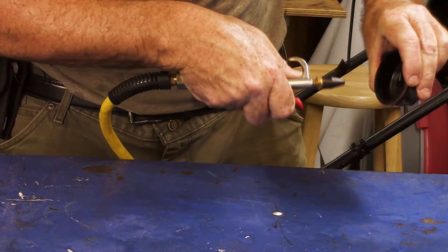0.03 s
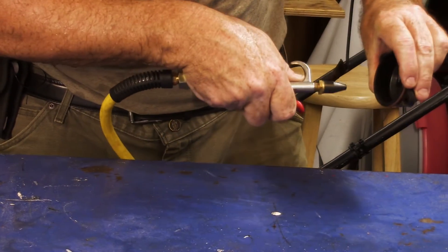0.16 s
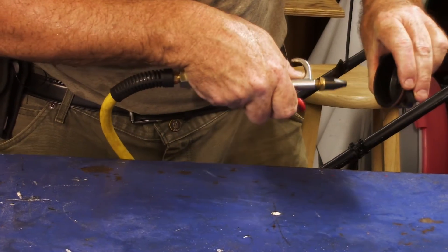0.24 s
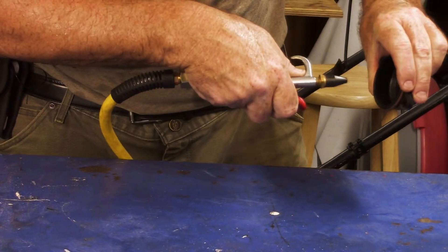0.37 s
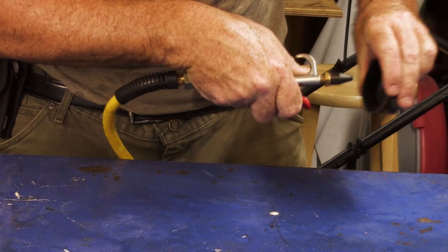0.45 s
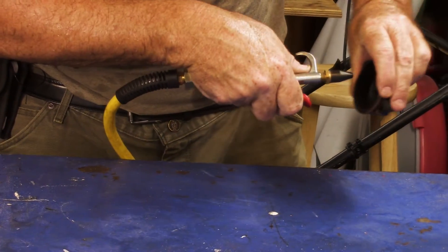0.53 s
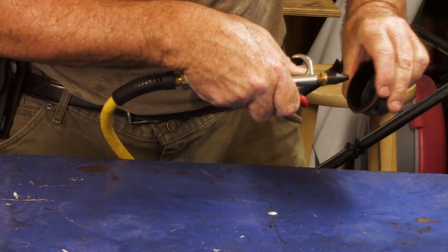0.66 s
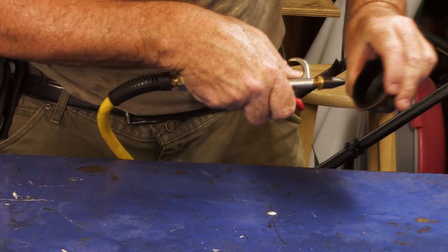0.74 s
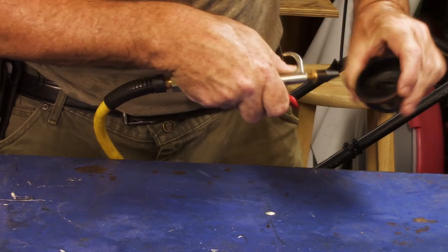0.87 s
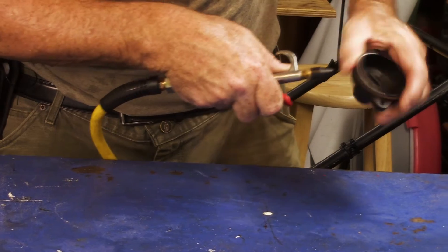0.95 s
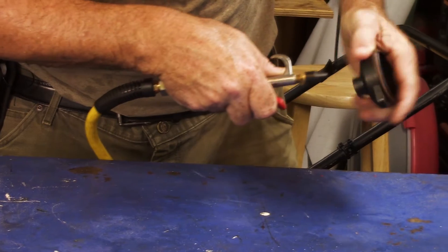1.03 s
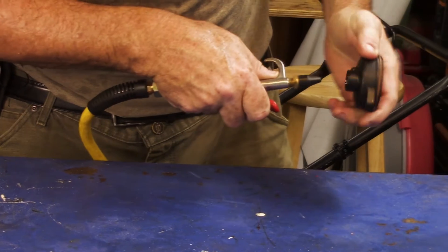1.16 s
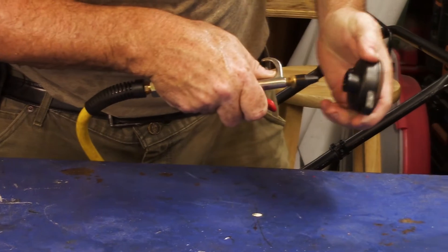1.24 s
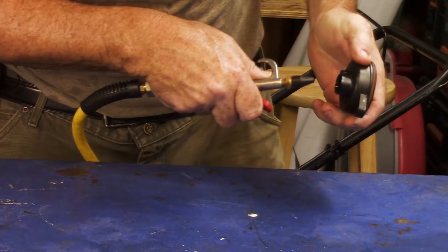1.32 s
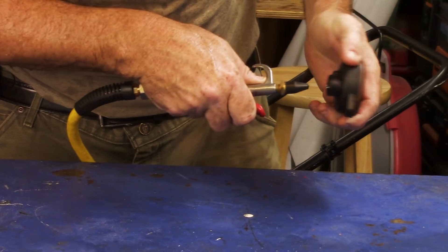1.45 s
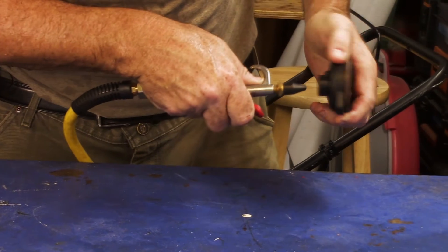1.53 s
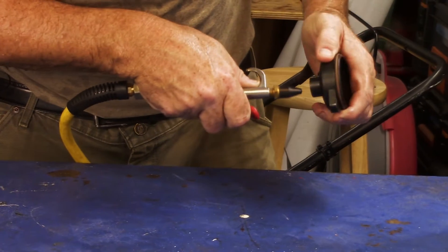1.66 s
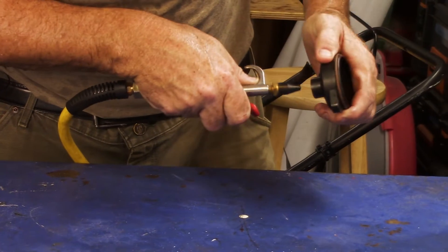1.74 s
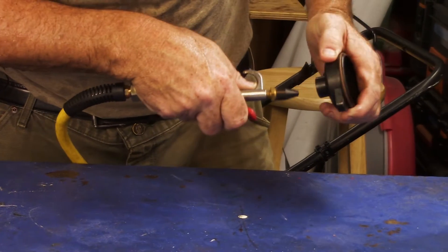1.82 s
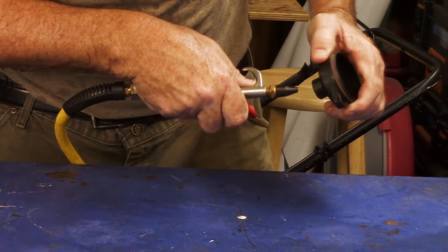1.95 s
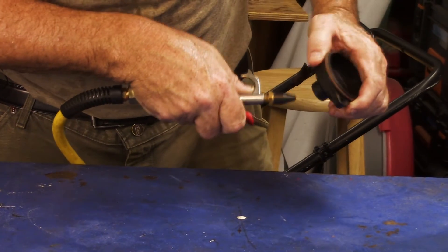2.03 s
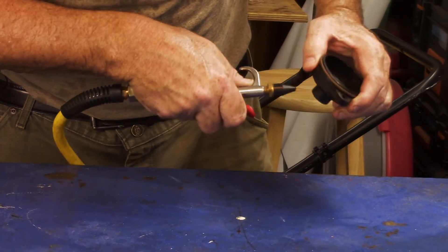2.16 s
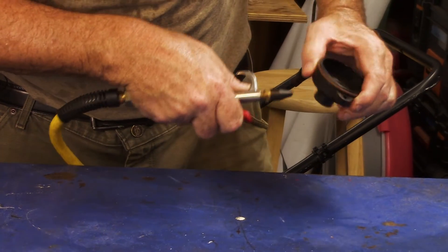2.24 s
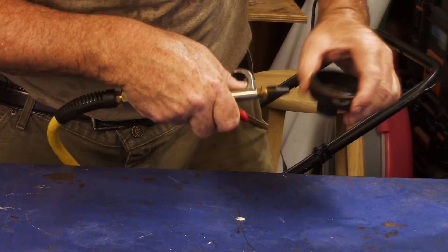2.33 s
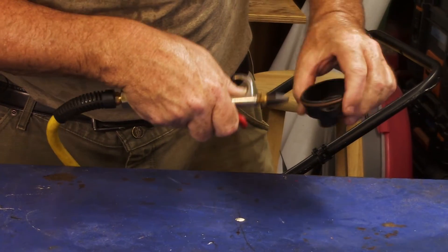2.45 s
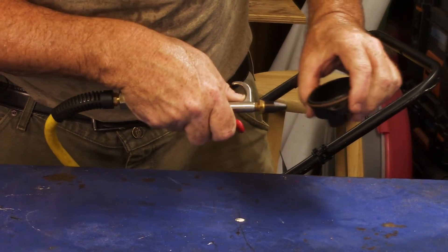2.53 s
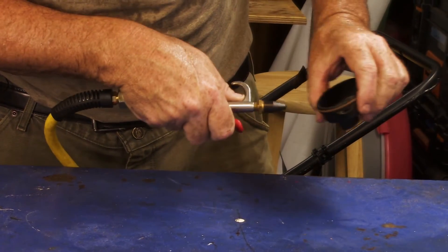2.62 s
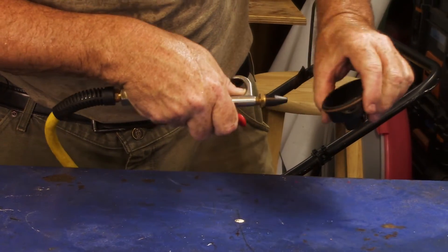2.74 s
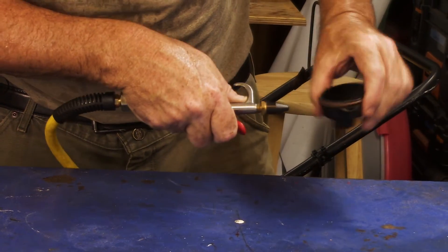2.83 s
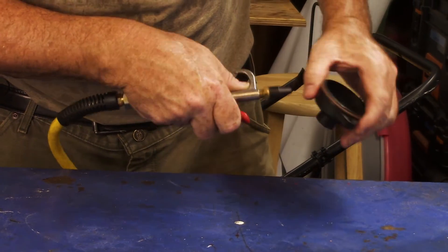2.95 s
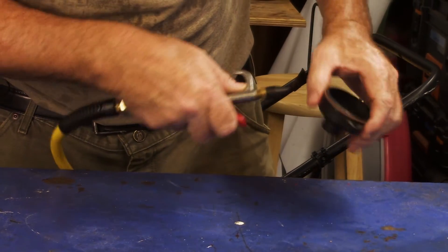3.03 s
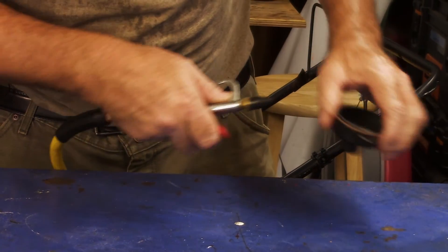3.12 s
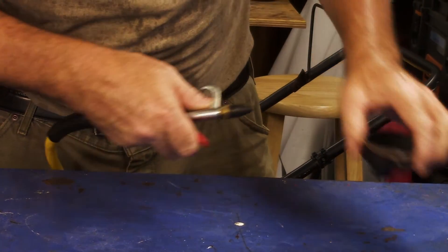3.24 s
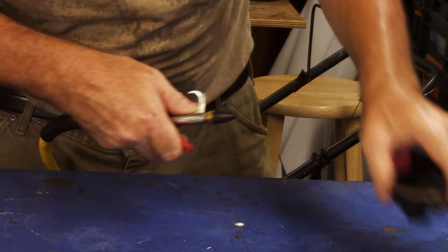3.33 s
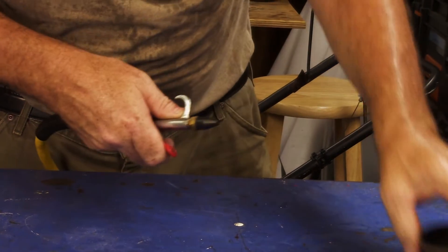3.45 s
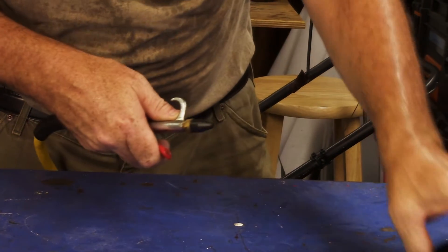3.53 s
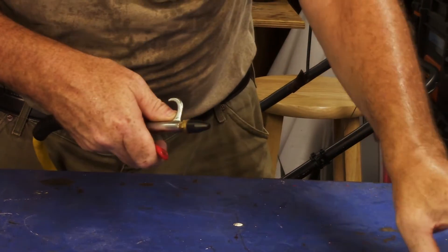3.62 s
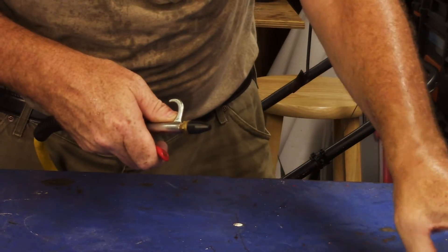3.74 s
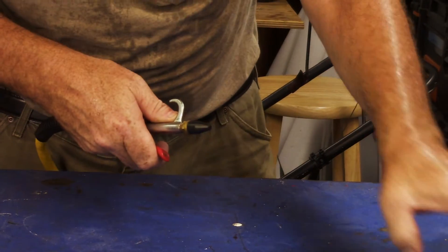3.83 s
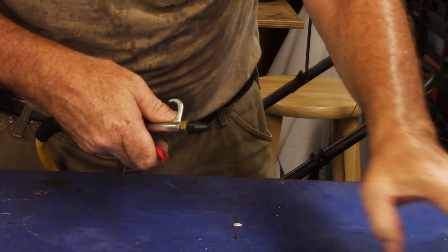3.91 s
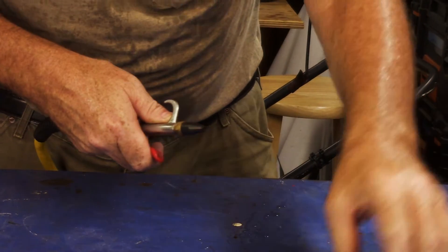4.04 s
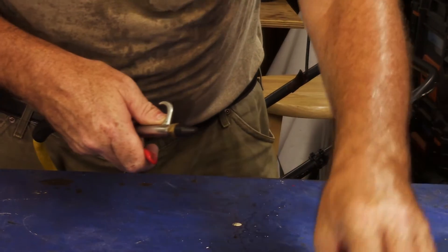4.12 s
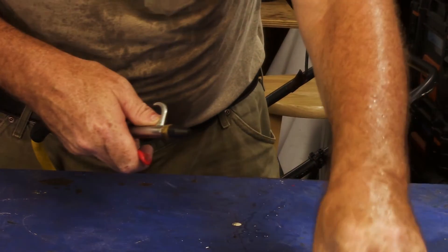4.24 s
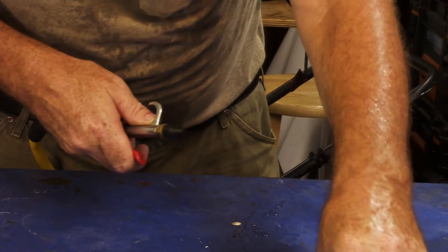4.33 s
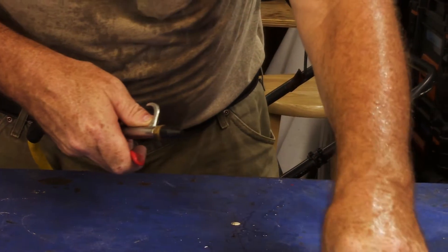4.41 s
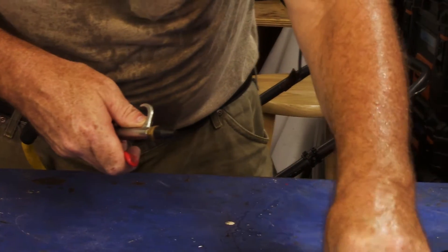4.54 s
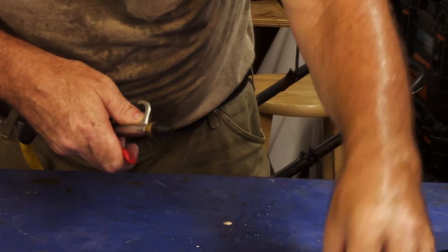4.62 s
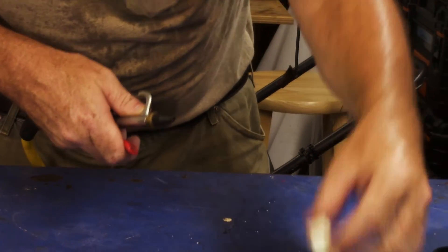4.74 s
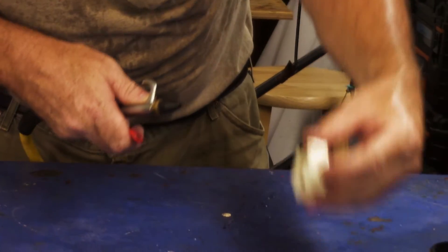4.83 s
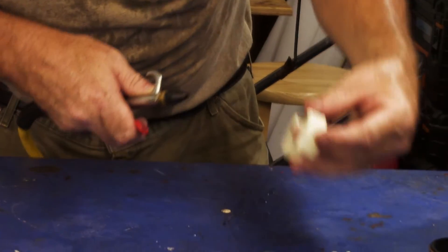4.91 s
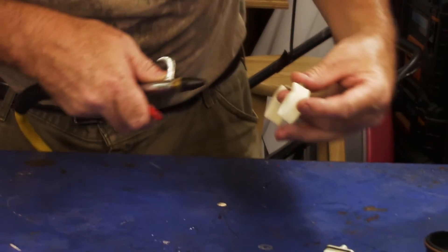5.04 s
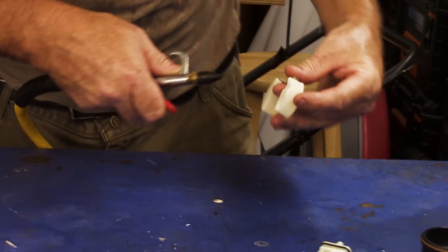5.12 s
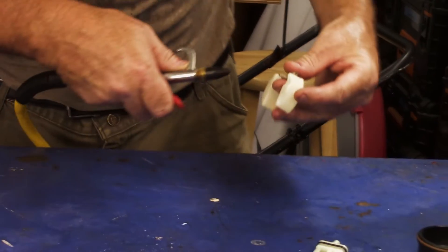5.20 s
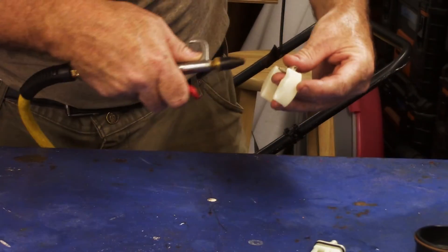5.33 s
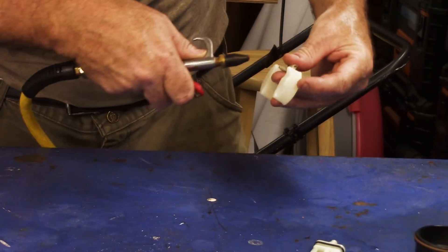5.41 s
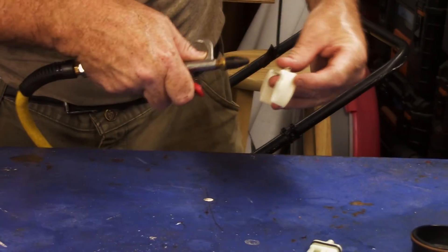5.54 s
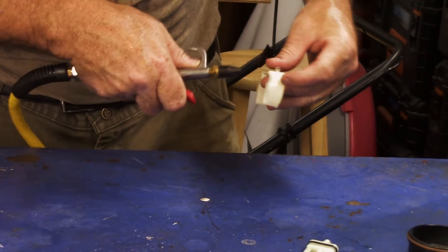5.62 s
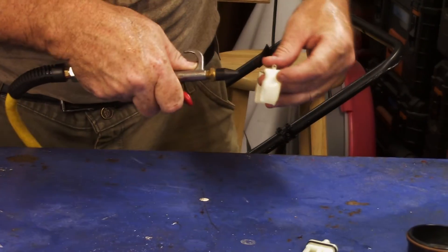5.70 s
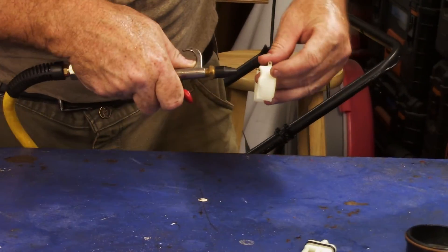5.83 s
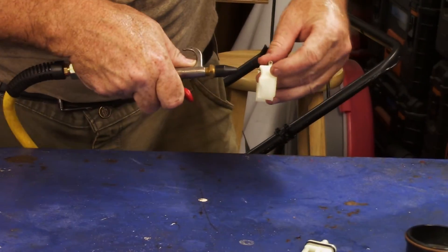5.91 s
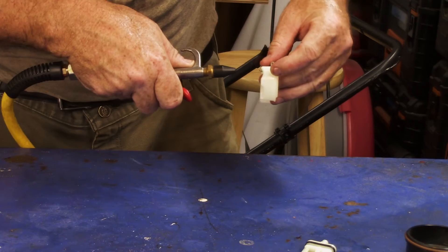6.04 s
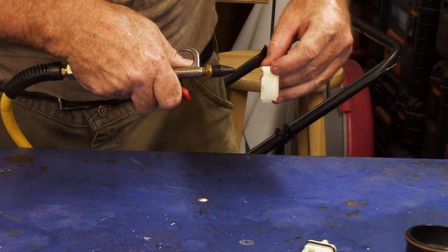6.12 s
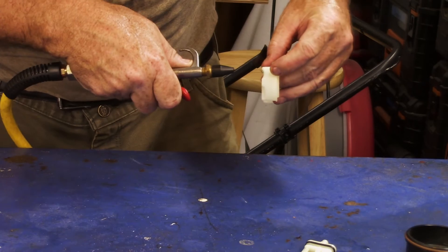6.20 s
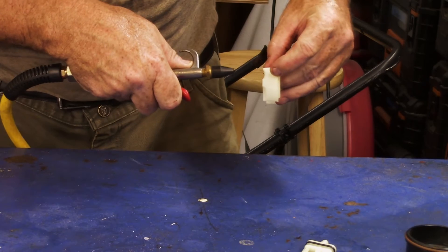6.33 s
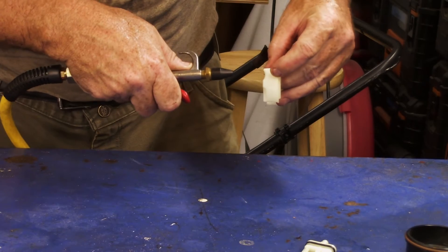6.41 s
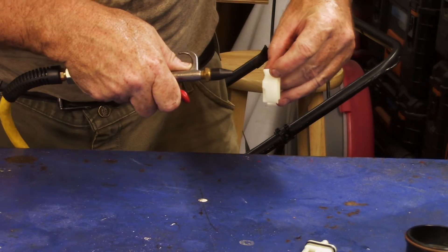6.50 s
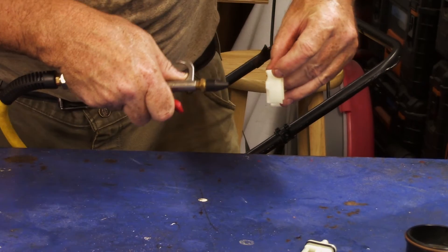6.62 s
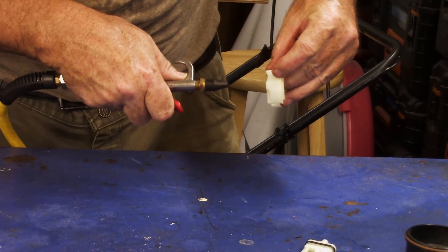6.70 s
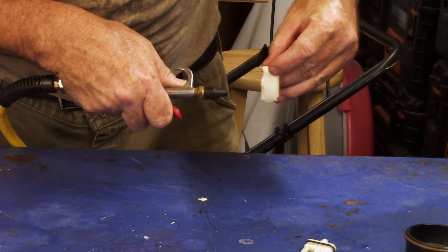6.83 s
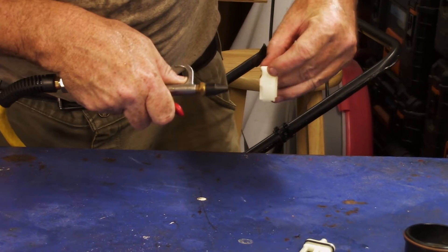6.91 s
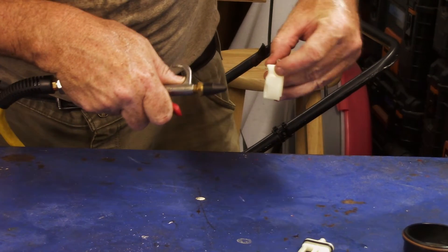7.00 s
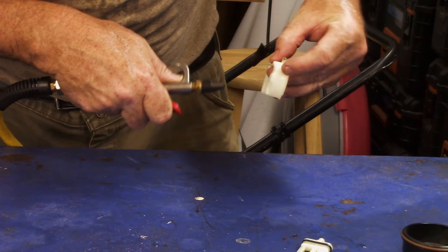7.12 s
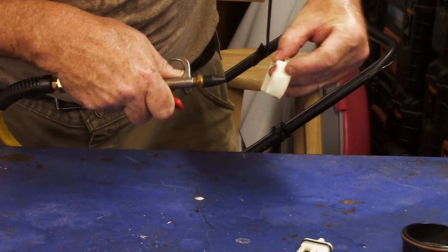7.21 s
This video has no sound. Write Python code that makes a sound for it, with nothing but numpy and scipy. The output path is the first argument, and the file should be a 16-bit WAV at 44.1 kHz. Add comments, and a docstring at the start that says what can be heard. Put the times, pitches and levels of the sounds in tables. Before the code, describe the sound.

In a cluttered home workshop, an air gun already blowing cuts off, ticks, then fires a short burst and a long roaring one with shifting hollow resonances and brief dips. After about three seconds only motor drone and fine leaking hiss remain, rising slowly. A light plastic cap knocks on the bench, then a softer, whistling blast lasts to the end. Close, compressed, dry pickup.

```python
"""Air blow gun at a workbench

Blasts of air clean a plastic cap, then a small plastic part; a motor runs and air leaks throughout.
The jet is shaped noise: it hisses, roars where it strikes a piece, rings its hollows and hoots over openings.
The lever ticks are noise bursts; the cap, set down between the blasts, is decaying modes plus a noise thud.
One close microphone: its limiter holds the blasts down, and the shop noise swells back slowly after them."""
import sys
import numpy as np
from scipy import signal
from scipy.fft import rfft, irfft
from scipy.io import wavfile
from scipy.ndimage import uniform_filter1d, map_coordinates

SR = 44100
rng = np.random.default_rng(int(sys.argv[2]) if len(sys.argv) > 2 else 0)


def generate_wav(signal):
    """Clip the signal to [-1, 1] and save it as 16-bit WAV at the path in sys.argv[1]."""
    frames = np.transpose(np.atleast_2d(signal))
    scaled = np.clip(frames, -1, 1) * 32767
    pcm = np.round(scaled).astype(np.int16)
    wavfile.write(sys.argv[1], SR, pcm)


N = 320166


def undb(db):
    """Decibels to gain."""
    return 10 ** (np.asarray(db) / 20)


def colour(points, hz):
    """Spectrum in dB at the given frequencies, scaled to unit mean power over them."""
    point_hz, point_db = np.transpose(points)
    db = np.interp(np.log(hz + 1), np.log(point_hz), point_db)
    return db - 10 * np.log10(np.mean(undb(db) ** 2))


def peak(hz, centre_hz, width_hz):
    """Bell shape of one resonance: 1 at its centre, 0.5 half a width away."""
    return np.exp2(-(2 * (hz - centre_hz) / width_hz) ** 2)


def gate(s, start_s, end_s, fade_s=0.027):
    """1 between start and end, with linear edges centred on them."""
    rise = np.clip((s - start_s) / fade_s + .5, 0, 1)
    fall = np.clip((end_s - s) / fade_s + .5, 0, 1)
    return rise * fall


def walk(s, rate_hz):
    """Smooth random wander with a spread near 1, through rate_hz random points per second."""
    steps = rng.standard_normal(2048)
    return map_coordinates(steps, [np.abs(s) * rate_hz], order=3, mode="wrap")


def noise(shape):
    """Turbulence: white noise given the level shape(Hz, s) in dB, frame by frame."""
    frame, overlap = 512, 384  # samples
    hz, s, spectrum = signal.stft(rng.standard_normal(N), SR, nperseg=frame, noverlap=overlap)
    gain = undb(shape(hz[:, None], s))
    return signal.istft(spectrum * gain, SR, nperseg=frame, noverlap=overlap)[1][:N]


def filtered(x, shape):
    """Steady filter whose gain in dB is shape(Hz)."""
    hz = np.fft.rfftfreq(len(x), 1 / SR)
    return irfft(rfft(x) * undb(shape(hz)), len(x))


def fading(t60_s):
    """Half a second of exponential decay, 60 dB per t60."""
    return np.exp(-np.log(1000) * np.arange(SR // 2) / SR / t60_s)


def blows(table, ring):
    """Each row (s, dB) sets off the ring."""
    hits = np.zeros(N)
    for s, db in table:
        hits[int(s * SR)] += undb(db)
    return signal.fftconvolve(hits, ring)[:N]


def shop(x, wet_db, t60_s, low_hz=700):
    """Direct sound plus dense reflections from the clutter, which scatters little bass."""
    tail = rng.standard_normal(SR // 2) * fading(t60_s)
    tail[:SR // 500] = 0  # no reflection in the first 2 ms
    tail = signal.sosfilt(signal.butter(2, low_hz, "high", fs=SR, output="sos"), tail)
    tail *= undb(wet_db) / np.linalg.norm(tail)
    tail[0] = 1
    return signal.fftconvolve(x, tail / np.linalg.norm(tail))[:N]


def ripples(hz, s, rate_hz, echo_s=.0016, count=6):
    """Comb pattern of short echoes off hands and bench whose paths slowly change; spread near 1."""
    comb = 0
    for delay_s in echo_s * rng.uniform(.3, 1.7, count):
        comb = comb + np.cos(2 * np.pi * hz * (delay_s + 4e-5 * walk(s, rate_hz)))
    # only short waves are thrown back by things so small
    return comb * np.sqrt(2 / count) * np.minimum(hz / 4000, 1)


def wavering(hz, s, centre_hz, width_hz, waver=.0092):
    """A resonance in the air near the hand, which is never still."""
    return peak(hz, centre_hz * (1 + waver * walk(s, 13)), width_hz)


def flow(s):
    """Level, low rush, sizzle and dulling in dB, from whichever press of the lever passes most air."""
    # Presses of the lever. Each row: pressed in s, time to open in s, let go in s, level in dB,
    # swell while held in dB/s, closing in dB/s, low rush in dB, sizzle in dB.
    blasts = [(-.2, .1, 0.29, 3, -14, 247, 9, 8.5), (.49, 0.17, 0.71, -.5, -4.5, 273, 10.5, 7.5),
              (1.09, 0.25, 2.214, 4.5, -8, 309, 4, 5), (2.1, .1, 2.32, -17.5, -11, 146, 4.5, -4),
              (2.315, 0.16, 2.7985, -2, 27, 274, 9, 5.5), (6.02, .41, 8.2, -7, -7.5, 300, -0.5, -3)]
    flow_db_per_decade = 68.5  # flow is a power of the lever's travel
    dull_db_per_s, dull_max_db = 79, 8.5  # on release the treble dies first
    columns = np.transpose(blasts)[:, :, None]
    pressed, opening, let_go, level_db, swell, close, rush_db, sizzle_db = columns
    travel = np.clip((s - pressed) / opening, 1e-4, 1)
    held_s = np.maximum(np.minimum(s, let_go) - pressed - opening, 0)
    closing_s = np.maximum(s - let_go, 0)
    db = level_db + flow_db_per_decade * np.log10(travel) + swell * held_s - close * closing_s
    press = np.argmax(db, axis=0)
    dull_db = np.clip(dull_db_per_s * (s - let_go[press, 0]), 0, dull_max_db)
    return db.max(axis=0), rush_db[press, 0], sizzle_db[press, 0], dull_db


def catches(hz, s, fade_s=.04, graze_roar_db=-4, part_in_hand_s=4.75):
    """Gain, roar and ringing in dB while the jet is in a hollow; turning the piece retunes its modes."""
    # The jet catches in the piece. Each row: start in s, end in s, gain in dB, roar in dB added to
    # that of a grazing jet, ring share, turn of the piece (0 facing, 1 away) at start and at end.
    catch_rows = [(-.1, 0.101, 5.5, 16, 0.45, 0.5, .6), (0.103, 0.206, 8.5, 18, 0.44, .6, 0.46),
                  (0.208, 0.436, 7, 12, 0.63, 0.5, 0.52), (0.529, 1.052, 6, 9.5, 0.61, 0.43, 0.41),
                  (1.308, 1.895, 9, 8.5, 1.1, 0.31, .85), (1.884, 2.084, 6.5, 4.5, 0.56, 0.3, .95),
                  (2.2, 2.242, 4.5, -6, 0.4, .95, 1), (2.374, 2.427, 13.5, 7.5, .1, .4, .45),
                  (2.572, 2.755, 7.5, 7, 0.74, 0.23, .1), (2.885, 2.945, 4.5, 2, .3, .3, .3),
                  (6.37, 6.571, 2.5, -1.5, 0.53, .05, .25), (6.551, 6.758, 1.5, 3, 1.56, 0.15, .55),
                  (6.751, 7.03, 4, -3, 1.26, 0.3, .9)]
    # Air in the hollows. Each row: Hz facing the jet, Hz turned away, width in Hz, dB at ring share 1.
    cap_hollow = [(1750, 1600, 400, 3), (4850, 3700, 530, 5.5), (6520, 7500, 1050, 8),
                  (12900, 11400, 1000, 6)]
    part_hollow = [(3700, 3900, 1030, 4.2), (8750, 11300, 3400, 3.3)]
    gain_db, roar_db, ring_db = 0, graze_roar_db, 0
    for start, end, gain, roar, ring, first_turn, last_turn in catch_rows:
        caught = gate(s, start, end, fade_s)
        turn = np.interp(s, [start, end], [first_turn, last_turn])
        gain_db = gain_db + caught * gain
        roar_db = roar_db + caught * roar
        hollow = cap_hollow if start < part_in_hand_s else part_hollow
        for facing_hz, away_hz, width_hz, db in hollow:
            mode_hz = facing_hz + turn * (away_hz - facing_hz)
            ring_db = ring_db + caught * ring * db * wavering(hz, s, mode_hz, width_hz)
    return gain_db, roar_db, ring_db


def blow_gun(roar_flutter_db=1.62, ripple_db=1.47, bass_cut_hz=100, tail_roar=0.93, throttle_fade_s=0.046,
             flutter_db=0.82, hoot_fade_s=.045):
    """Jet noise, coloured by the valve and by whatever the jet strikes."""
    # Jet spectrum. Each row: Hz, relative dB per Hz.
    jet_colour = [(50.0, -37.5), (110.0, -27.5), (220.0, -20), (420.0, -9.5), (650.0, -7), (1000.0, 0.5),
                  (2000.0, 1), (4000.0, 2), (6000.0, 0.84), (8500.0, 2.5), (11000.0, -1.5), (12400.0, -7.5),
                  (13400.0, -12.5), (15700.0, -12.5)]
    # Resonances of the barely open valve. Each row: Hz, width in Hz, dB.
    valve = [(3800, 1000, 9), (8040, 1300.0, 13.5), (13100, 530, 12)]
    # Lever only just pressed. Each row: start in s, end in s, level in dB.
    throttled_rows = [(0.403, 0.574, -31.5), (1.08, 1.204, -31.5), (6.12, 6.24, -61)]
    # Standing waves between bench, body and microphone. Each row: Hz, width in Hz, dB.
    bench = [(494, 98, 3), (1007, 21, -4.5), (1278, 53, 1.5), (1540, 23, 4), (1590, 60, 1), (1756, 40, -2),
             (2294, 31, 8.5), (2500, 65, 4), (2656, 60, 2)]
    # Jet across an opening: hoot or whistle. Each row: start in s, end in s, Hz, width in Hz, dB.
    hoots = [(-.1, .42, 4620, 400, 7), (0.633, 0.807, 465, 150, 9.5), (1.3, 1.72, 1720, 650, 4),
             (2.382, 2.435, 1132, 1000, 10), (2.833, 2.94, 1800, 700, 6), (6.203, 6.51, 2460, 603, 7),
             (6.377, 6.717, 497, 150, 10), (6.31, 6.542, 9900, 450, 5.5), (6.53, 7.036, 5440, 1550, 7.5),
             (7.04, 7.3, 3820, 1520, 4.5)]
    rush_loss, sizzle_loss = 0.62, 0.46  # dB lost per dB gained by a catch

    def shape(hz, s):
        flow_db, rush_db, sizzle_db, dull_db = flow(s)
        catch_db, roar_db, ring_db = catches(hz, s)
        # big eddies on the piece roar and rush; small ones at its edges sizzle
        pitch = np.log(hz + 1)
        roar = np.interp(pitch, np.log([60, 400, 1200, 2500, 7000]), [0.87, 0.7, 1, 0.79, 0.058])
        rush = np.interp(pitch, np.log([400, 1200]), [1, 0])
        sizzle = np.interp(pitch, np.log([5000, 15000]), [0, 1])
        db = colour(jet_colour, hz)
        db = db + roar * (roar_db + tail_roar * dull_db + roar_flutter_db * walk(s, 25))
        db = db + rush * (rush_db - rush_loss * catch_db)
        db = db + sizzle * (sizzle_db - sizzle_loss * catch_db - dull_db)
        db = db + ring_db + ripple_db * ripples(hz, s, rate_hz=3.0)
        for start, end, centre_hz, width_hz, gain_db in hoots:
            blown = gate(s, start, end, hoot_fade_s)
            db = db + gain_db * blown * wavering(hz, s, centre_hz, width_hz)
        size = undb(flow_db + catch_db)
        valve_db = sum(gain_db * peak(hz, centre_hz, width_hz) for centre_hz, width_hz, gain_db in valve)
        for start, end, seep_db in throttled_rows:
            throttled = gate(s, start, end, throttle_fade_s)
            db = db + throttled * valve_db
            size = np.hypot(size, throttled * undb(seep_db))
        # colour only shares the power out among the bands; flow and catch set how much there is
        db = db - 10 * np.log10(np.mean(undb(db) ** 2, axis=0))
        return db + 20 * np.log10(size + 1e-9) + flutter_db * walk(s, 30)

    def bench_db(hz):
        return sum(db * peak(hz, centre_hz, width_hz) for centre_hz, width_hz, db in bench)

    jet = filtered(noise(shape), bench_db)
    # so small a nozzle radiates little bass
    jet = signal.sosfilt(signal.butter(1, bass_cut_hz, "high", fs=SR, output="sos"), jet)
    return shop(jet, wet_db=-7.5, t60_s=0.07)


def motor(turn_hz=58.87, fan_db=-41.5, waver_db=2.8, throb=0.085):
    """Shaft harmonics that waver slightly, over a fan rush that throbs once a turn."""
    # Shaft harmonics. Each row: multiple of the turning rate, mean level in dB rms.
    harmonics = [(4, -61), (7, -55), (12, -64.5), (14, -55.5), (15, -59.5), (16, -49.5), (17, -57),
                 (18, -56), (19, -64.5)]
    # Air moved by the motor. Each row: Hz, relative dB per Hz.
    fan_colour = [(30, -27), (70, -23.5), (150, -5.5), (400, -0.5), (700, -2.5), (1000, -5.5), (1500, -8.5),
                  (2400, -13.5), (4000, -17), (8000, -21), (15000, -45)]
    s = np.arange(N) / SR
    coarse_s = s[::256]
    drift = 0.00054 * np.interp(s, coarse_s, walk(coarse_s, 4.4))
    turns = np.cumsum(turn_hz * (1 + drift)) / SR
    hum = 0
    for multiple, db in harmonics:
        amplitude = np.sqrt(2) * undb(db + waver_db * np.interp(s, coarse_s, walk(coarse_s, 6)))
        hum = hum + amplitude * np.sin(2 * np.pi * (multiple * turns + rng.random()))
    eddies = rng.standard_normal(N) * (1 + throb * np.sin(2 * np.pi * turns))
    return hum + filtered(eddies, lambda hz: colour(fan_colour, hz) + fan_db)


def leak(hiss_db=-46, ripple_db=2, hand_db=2.1, sound_m_per_s=343):
    """Air seeps from the gun all the time; the moving hand throws the hiss back and shifts its colour."""
    # Thin hiss. Each row: Hz, relative dB per Hz.
    hiss_colour = [(3000, -36), (4500, -15.5), (5200, -3), (5900, -1.5), (6600, -7.5), (7500, -9),
                   (8500, -17), (9700, -14.5), (11200, -18), (12500, -30.5), (15500, -39)]
    # The hiss dulls, then brightens again. Each row: s, treble in dB (in full from 11 kHz up).
    hiss_treble = [(0, 0), (2.9, -10), (3.3, 0), (3.8, 1.5), (4.3, 0.5), (7.26, 2)]
    # Echo off the hand. Each row: s, extra path in m.
    hand_path = [(3.1, 0.18), (3.5, 0.14), (3.85, .17), (4.4, 0.17), (4.8, 0.19), (5.05, .157),
                 (5.27, 0.18), (5.9, 0.2)]

    def shape(hz, s):
        treble_db = np.interp(s, *np.transpose(hiss_treble)) * np.interp(hz, [4000, 11000], [0, 1])
        delay_s = np.interp(s, *np.transpose(hand_path)) / sound_m_per_s
        echo = np.cos(2 * np.pi * hz * delay_s)
        db = colour(hiss_colour, hz) + hiss_db + treble_db
        return db + hand_db * echo + ripple_db * ripples(hz, s, rate_hz=2.3)

    return shop(noise(shape), wet_db=-6, t60_s=.16)


def lever(tick_db=-19, t60_s=0.01):
    """Short bright ticks as the lever lifts the valve off its seat."""
    # Each row: time in s, relative level in dB.
    ticks = [(.5355, -4), (.5388, -2), (.5405, -2), (1.049, -19)]
    # Each row: Hz, relative dB per Hz.
    tick_colour = [(200, -18), (1500, -14), (5500, -6), (7800, 2), (10000, -18), (15000, -28)]
    tick = filtered(rng.standard_normal(SR // 2), lambda hz: colour(tick_colour, hz))
    return blows(ticks, undb(tick_db) * tick * fading(t60_s))


def cap(ring_db=-45, crack_db=-26, t60_at_1khz_s=0.19, damping=1.0):
    """The rim lands in a few quick contacts: the cap rings, the bench top thuds and its highs die first."""
    # Contacts. Each row: time in s, relative level in dB.
    knocks = [(3.5392, 10), (3.547, -14), (3.558, -3), (3.576, -8), (3.585, 3), (3.611, -15)]
    # Modes of the cap on the bench top. Each row: Hz, relative level in dB, t60 in s.
    modes = [(285, -12, .18), (377, -10, .2), (477, -11, .14), (660, -8, .15), (760, -7, .11),
             (990, -5, .12), (1050, -5, .14), (1320, 4, .09), (1390, 10, .11), (1610, -8, .09),
             (1960, -4, .07), (2290, -3, .06), (2640, -4, .06), (2900, -14, .05)]
    # Dull crack of the contact. Each row: Hz, relative dB per Hz.
    crack_colour = [(100, -19), (350, 4.5), (700, 0), (1400, 2.5), (2700, -3.5), (3600, -9), (4700, -23),
                    (8000, -10), (11000, -29), (13000, -48)]
    s = np.arange(SR // 2) / SR
    ring = 0
    for mode_hz, db, t60_s in modes:
        ring = ring + undb(db) * fading(t60_s) * np.sin(2 * np.pi * (mode_hz * s + rng.random()))
    push = filtered(rng.standard_normal(len(s)), lambda hz: colour(crack_colour, hz))
    thud = 0
    for low_hz in 100 * 2 ** np.arange(0, 7, .5):  # half-octave bands
        high_hz = low_hz * np.sqrt(2)
        band = filtered(push, lambda hz: np.where((hz >= low_hz) & (hz < high_hz), 0, -np.inf))
        thud = thud + band * fading(min(t60_at_1khz_s * (1000 / low_hz) ** damping, .35))
    knock = blows(knocks, undb(ring_db) * ring + undb(crack_db) * thud)
    # the knock keeps to the band between 150 Hz and 9 kHz
    knock = signal.sosfilt(signal.butter(2, [150, 9000], "band", fs=SR, output="sos"), knock)
    return shop(knock, wet_db=-5.5, t60_s=0.35, low_hz=396)


def scene():
    """All sources at one microphone, the same in both channels."""
    mono = blow_gun() + motor() + leak() + cap() + lever()
    return np.array([mono, mono])


def record(dry, limit_db=-9.0, release_db_per_s=15.5, knee_db=-1.0, top_hz=15700):
    """A limiter that grabs fast and lets go slowly, soft overload, and a steep top cut."""
    power = uniform_filter1d(dry[0] ** 2, size=500)
    over_db = np.maximum(10 * np.log10(np.abs(power) + 1e-12) - limit_db, 0)
    recovery_db = release_db_per_s * np.arange(N) / SR
    # the running maximum keeps each peak's cut, less the recovery since
    gain_db = recovery_db - np.maximum.accumulate(over_db + recovery_db)
    held = dry * undb(gain_db)
    rounded = held / (1 + (held / undb(knee_db)) ** 6) ** (1 / 6)
    return signal.sosfilt(signal.ellip(10, .1, 80, top_hz, fs=SR, output="sos"), rounded)


dry = scene()
out = record(dry)
generate_wav(out)
```